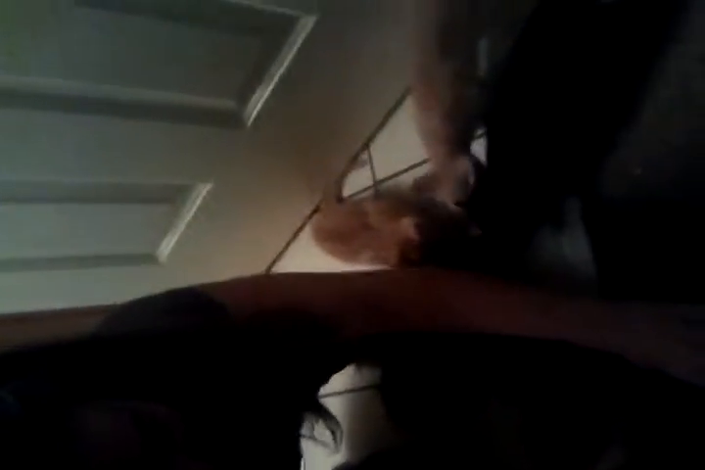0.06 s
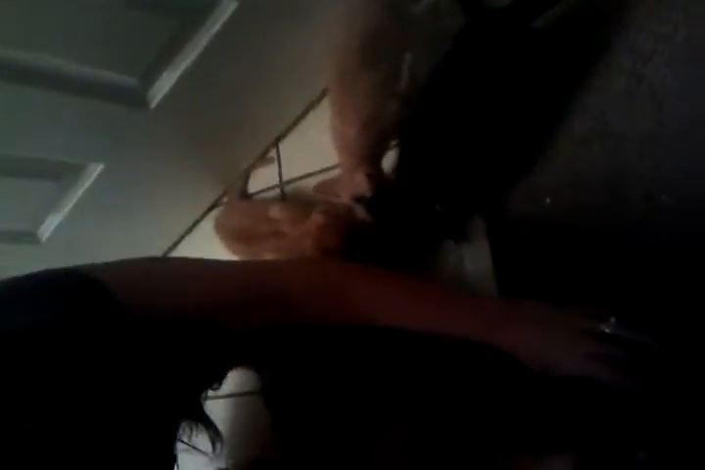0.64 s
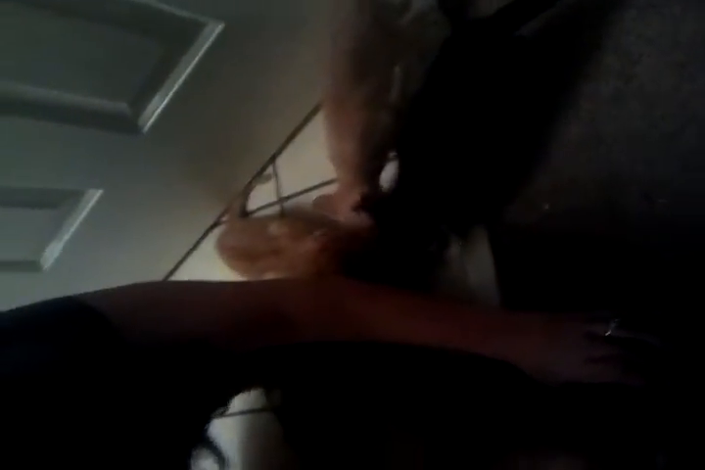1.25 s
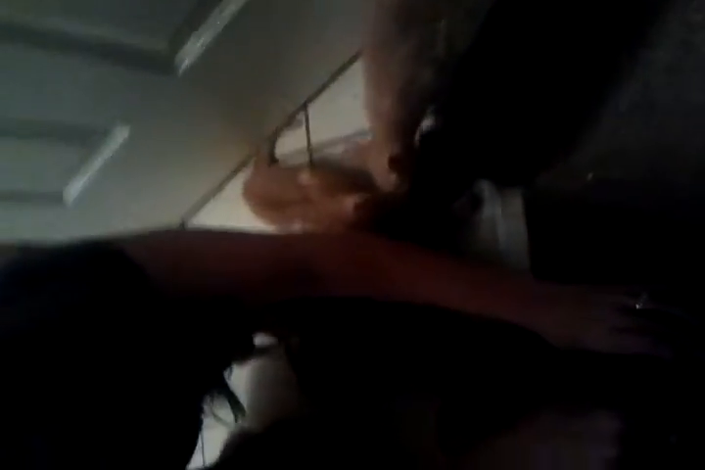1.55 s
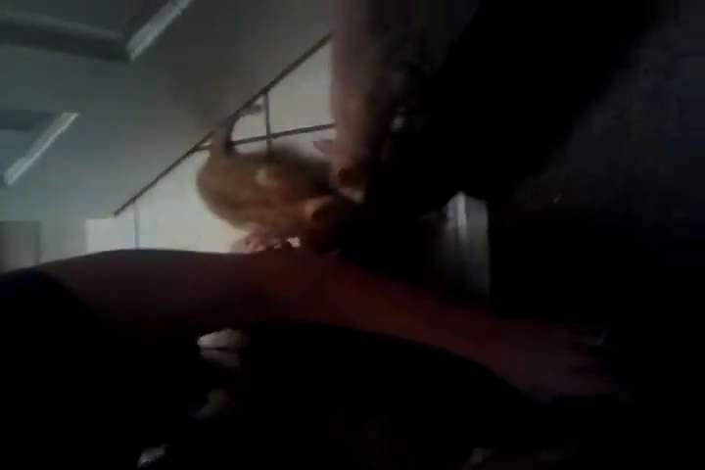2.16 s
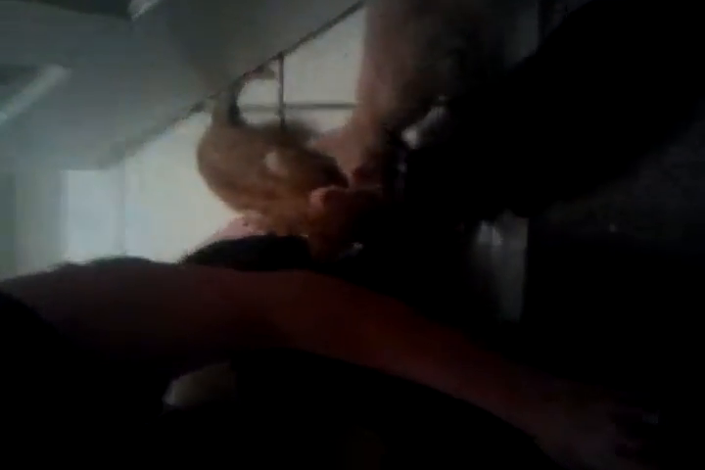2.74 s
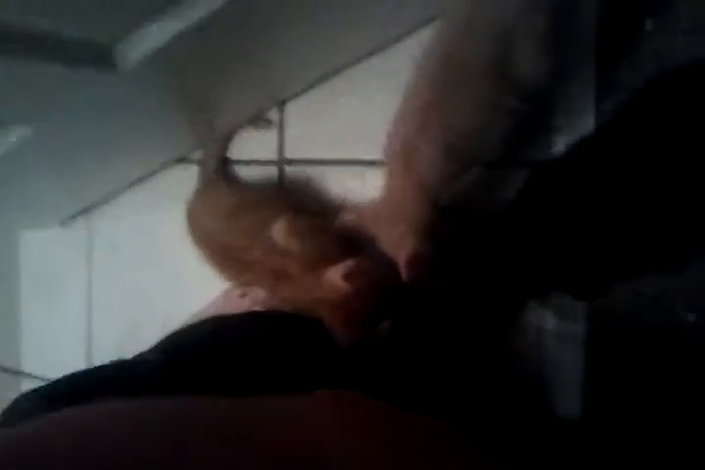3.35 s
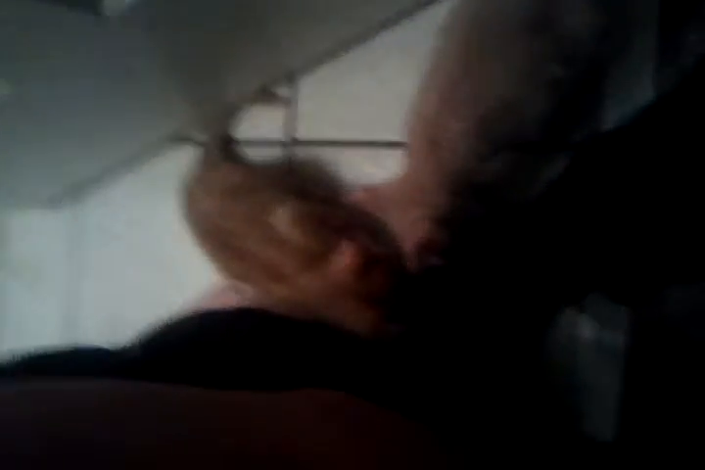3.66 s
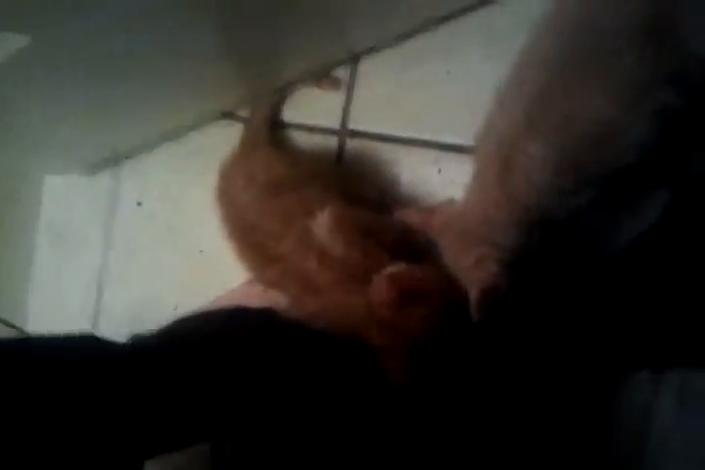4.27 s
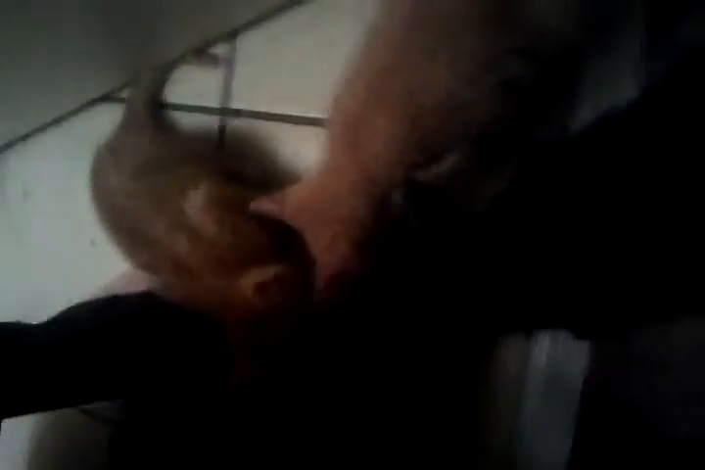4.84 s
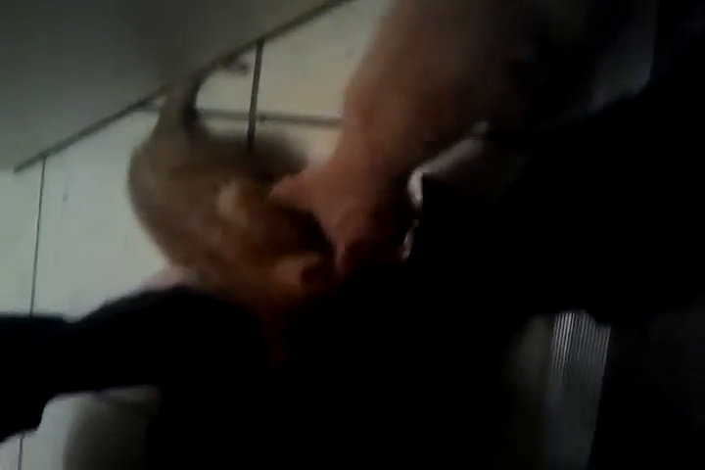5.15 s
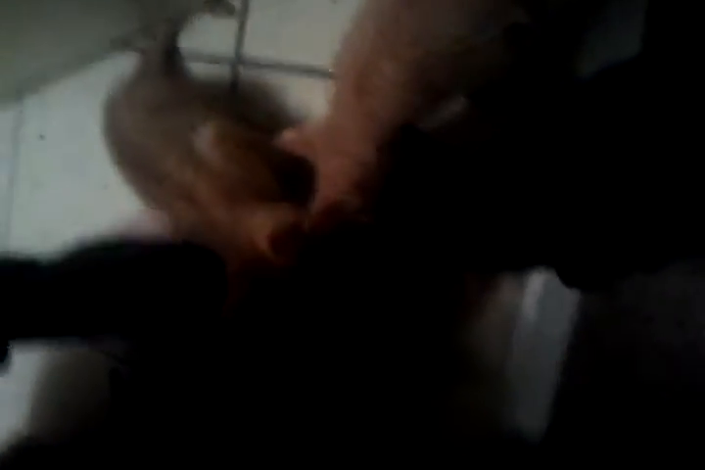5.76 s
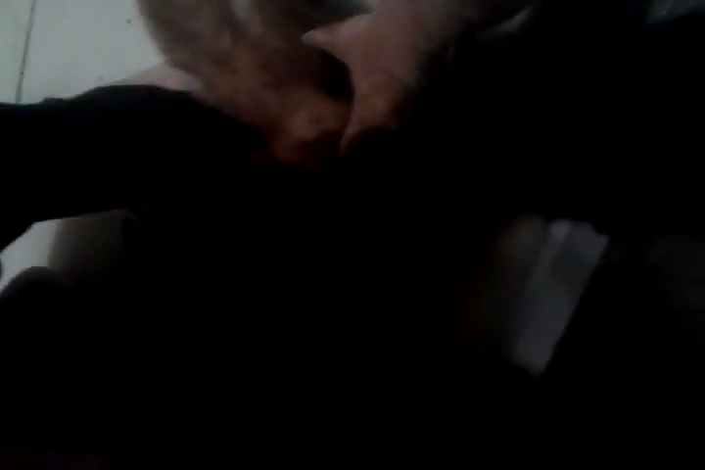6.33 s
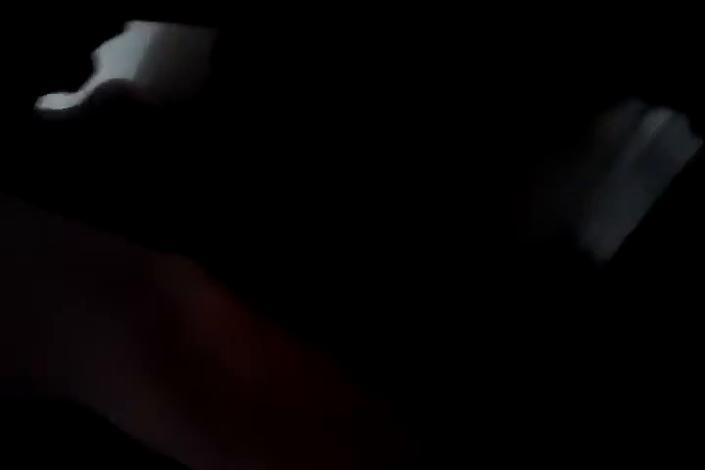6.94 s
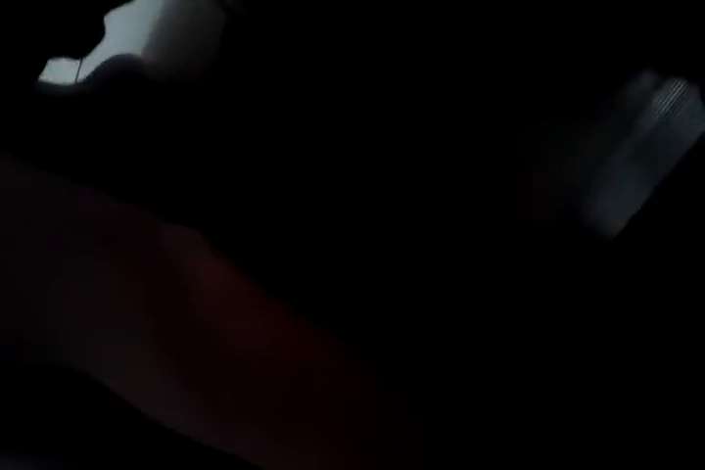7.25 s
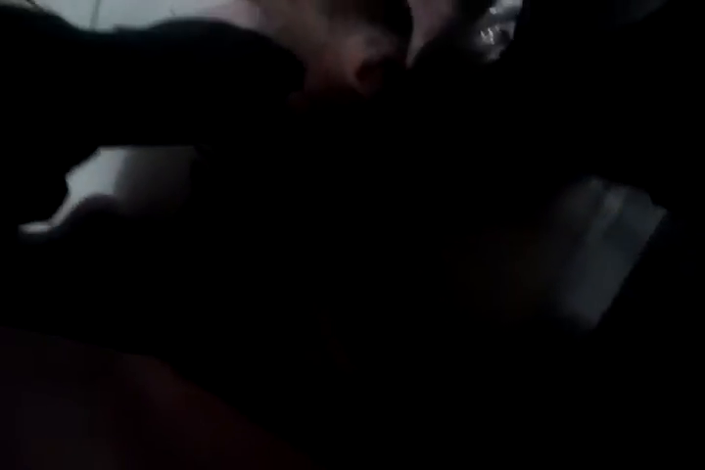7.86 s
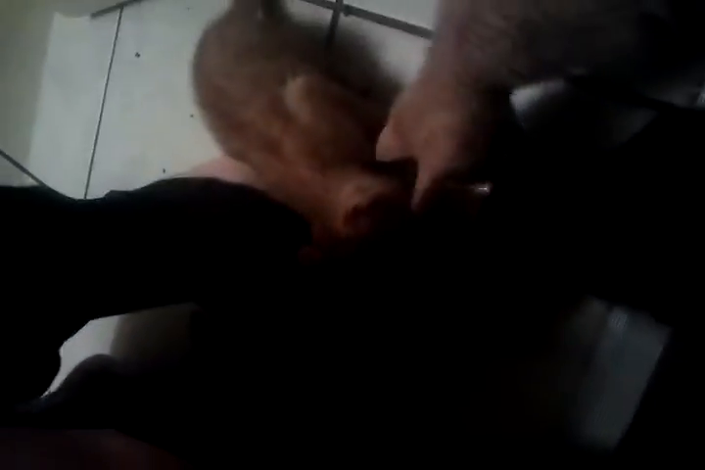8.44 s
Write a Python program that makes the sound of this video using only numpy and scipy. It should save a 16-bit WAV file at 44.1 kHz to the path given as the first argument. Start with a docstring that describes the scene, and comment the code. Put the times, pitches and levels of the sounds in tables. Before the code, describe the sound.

Faint, muffled scrapes of a plastic bowl on tiles mix with small chewing ticks and dull footsteps. Then cloth rubs right on the microphone with a quick run of sharp clicks and knocks, the loudest moment. Afterwards the kittens sound nearer: the bowl slides and taps a few more times, and they nibble, lick and smack softly over light brushing and low room hiss.

```python
"""Kittens eat from a plastic bowl: teeth tick, mouths smack, and the bowl scuffs and taps on the tiles
as they push it. A phone is held just above them, at first shaded by an arm; then a sleeve drags over it
and its case clatters. Soft steps, a thin whirr and a few clinks pass by, and later something rubs with
a soft squeak. The room is quiet, and the treble is cut off above about 8 kHz."""
import sys
import numpy as np
from scipy import signal
from scipy.fft import rfft, irfft
from scipy.io import wavfile
from scipy.ndimage import uniform_filter1d

SR = 44100
rng = np.random.default_rng(int(sys.argv[2]) if len(sys.argv) > 2 else 0)


def to_wav(sig):
    """Store sig (one row per channel, or 1-D mono) as 16-bit WAV at the path in sys.argv[1].

    Samples outside -1..1 are clipped; the rate is SR.
    """
    pcm = np.clip(np.atleast_2d(sig), -1, 1) * 32767
    pcm = np.round(pcm).astype(np.int16)
    wavfile.write(sys.argv[1], SR, pcm.T)  # frames by channels


N = 374850
T = np.arange(N) / SR


def undb(db):
    """Turn decibels into a factor to multiply by."""
    return 10 ** (np.asarray(db) / 20)


def unit(x):
    """Scale x to an average strength (rms) of 1."""
    return x / np.sqrt(np.mean(x ** 2))


def add(out, start_s, x):
    """Mix x into out, beginning at start_s."""
    i = int(start_s * SR)
    out[i:i + len(x)] += x[:N - i]


def colour(x, points):
    """Shape the tone of x along a curve of (f/Hz, level/dB) points."""
    hz, db = np.transpose(points)
    bin_hz = np.maximum(np.arange(len(x) // 2 + 1) * SR / len(x), 1)
    curve_db = np.interp(np.log(bin_hz), np.log(hz), db)
    return irfft(rfft(x) * undb(curve_db), len(x))


def band(x, hz, kind, order=2):
    """Keep what lies below hz ("low") or above it ("high")."""
    return signal.sosfilt(signal.butter(order, hz, kind, fs=SR, output="sos"), x)


def resonate(x, hz, width_hz):
    """A resonance: keep the band around hz. The narrower it is, the longer it rings."""
    sharpness = hz / min(width_hz, SR / 4)
    return signal.lfilter(*signal.iirpeak(min(hz, SR / 4), sharpness, fs=SR), x)


def wander(rate):
    """A smooth random curve, mostly within -1 to 1, that finds a new value rate times a second."""
    hold = int(SR / rate)
    stairs = np.repeat(rng.standard_normal(N // hold + 1), hold)
    return 1.3 * uniform_filter1d(uniform_filter1d(stairs, hold), hold)[:N]


def friction(grip_db, catch_hz):
    """One second of tiny slips whose strength comes and goes as two surfaces catch."""
    span = int(SR / catch_hz)
    catch = unit(uniform_filter1d(uniform_filter1d(rng.standard_normal(SR), span), span))
    return rng.standard_normal(SR) * undb(grip_db * catch)


def tint(x, bass_db, treble_db):
    """Set the bass and treble of one second of sound against its middle, which gets strength 1."""
    hz, spectrum = np.maximum(np.arange(SR // 2 + 1), 1.), rfft(x)
    low = 1 / (1 + (hz / 700) ** 8)
    high = 1 / (1 + (3300 / hz) ** 10)
    parts = (bass_db, low), (0, 1 - low - high), (treble_db, high)
    return sum(undb(db) * unit(irfft(spectrum * share, SR)) for db, share in parts)


def swell(rise_s, fall_s, shape):
    """The loudness of one slide: a smooth rise, then a fall of the given shape."""
    t = T[:SR]
    rise = np.sin(np.pi / 2 * np.minimum(t / rise_s, 1)) ** 2
    return rise * shape(np.maximum(t - rise_s, 0) / fall_s)


def decay(progress):
    """Dying away. Pass t / t60, where t60 is the time a sound takes to fall by 60 dB."""
    return undb(-60 * progress)


def ease_out(progress):
    """A gentle fade that reaches silence when progress is 1."""
    return np.cos(np.pi / 2 * np.minimum(progress, 1)) ** 2


def crackles(events, attack_s=0.000088, scatter=0.23):
    """Short bursts of noise, one for each (t/s, level/dB, f/Hz, t60/s, width as a share of f)."""
    out, t = np.zeros(N), T[:SR // 8]
    for (start, db, hz, t60, width), noise in zip(events, rng.standard_normal((len(events), len(t)))):
        main = resonate(noise, hz, width * hz)
        drop = np.clip(scatter * width * abs(noise[0]), 0, .7)  # the lower ring differs every time
        lower = undb(-3) * resonate(noise, hz * (1 - drop), width_hz=500)
        fade = (1 - np.exp(-t / attack_s)) * decay(t / t60)
        burst = unit((main + lower) * fade)
        add(out, start, undb(db) * np.sqrt(np.mean(fade ** 2)) * burst)
    return out


def background(air_db=-56.5, sway_db=-0.5, hum_sway_db=2.5):
    """Quiet room air and microphone hiss, with a faint household hum that comes and goes."""
    # tone of the air and hiss: f/Hz, relative level/dB
    air_tone = [(15, -44.5), (25, -24), (91, -9), (108, -9), (215, -4), (255, -5), (281, -6), (386, -4.5),
                (469, -4.5), (908, -8.5), (1050, -8.5), (2790, -16), (6900, -17.5), (8600, -16.5),
                (11200, -85), (18900, -120)]
    # notes of the hum: f/Hz, typical level/dB
    hum_notes = [(120, -77.5), (234, -77.5), (285, -72.5), (478, -75.5)]
    air = unit(colour(rng.standard_normal(N), air_tone)) * undb(air_db + sway_db * wander(11))
    hum = np.zeros(N)
    for hz, db in hum_notes:
        note = unit(np.sin(2 * np.pi * hz * T + wander(5)))
        hum += note * undb(db + hum_sway_db * wander(0.68))
    return air + hum


def bowl(gain_db=-2, judder_db=8, shaded_until_s=2.5, tap_rise_s=0.0021, tap_t60=0.05, tap_hz=1200):
    """Each push makes the bowl slide or tap; it judders at one pitch and sets its walls ringing."""
    # slides over the tiles: t/s, rise/s, t60/s, relative level/dB, judder f/Hz
    scuffs = [(0.407, 0.0039, 0.52, -45.5, 1570), (.437, 0.0022, 0.17, -35.5, 2610),
              (.6, 0.028, .17, -50, 1290), (0.905, .003, 0.51, -44, 1285), (1.251, 0.0023, 0.29, -38, 1360),
              (1.277, 0.012, 0.25, -40.5, 1120), (1.398, 0.0038, 0.18, -44, 1170),
              (1.534, 0.0069, .1, -47, 484), (1.649, 0.0044, 0.33, -38.5, 1140),
              (3.486, 0.0032, .1, -25.5, 1180), (3.503, 0.015, 0.18, -30, 1240),
              (3.542, 0.015, 0.19, -33.5, 987), (3.62, 0.023, 0.23, -38.5, 1315),
              (3.761, 0.0025, 0.24, -40, 1040), (3.774, .014, .16, -34, 1130),
              (4.783, .003, 0.093, -36, 2530), (4.798, 0.017, 0.23, -34.5, 670),
              (4.899, 0.059, 0.21, -41.5, 1090), (4.976, .015, 0.39, -40, 2550),
              (5.085, 0.028, 0.14, -40.5, 4300), (5.167, 0.014, 0.17, -43, 614)]
    # taps down on the tiles: t/s, relative level/dB
    taps = [(1.321, -36.5), (3.486, -27), (3.575, -24.5), (3.799, -31), (4.81, -38), (4.845, -35.5)]
    # resonances of the plastic walls: f/Hz, width/Hz, relative level/dB
    rings = [(370, 580, -9), (618, 210, -0.5), (1080, 155, 4.5), (1297, 237, 2), (1610, 334, 1.5),
             (2113, 245, -0.5), (2550, 160, 0), (3300, 310, -7), (3920, 270, -9.5), (4250, 140, -7.5),
             (5110, 340, -11.5), (5600, 77, -7), (6040, 190, -10), (6660, 95, -6), (7300, 1700, -13.5)]
    out = np.zeros(N)
    pushes = scuffs + [(start, tap_rise_s, tap_t60, db, tap_hz) for start, db in taps]
    for start, rise_s, t60, level_db, judder_hz in pushes:
        slips = friction(grip_db=2, catch_hz=570)
        slips = slips + undb(judder_db) * resonate(slips, judder_hz, width_hz=110)
        walls = sum((-1) ** k * undb(db) * resonate(slips, hz, width)
                    for k, (hz, width, db) in enumerate(rings))
        # an arm shades the bowl at first: more bass, less treble
        bass_db, treble_db = (-10.5, -13.5) if start < shaded_until_s else (-12.5, -1)
        add(out, start, undb(level_db) * tint(walls, bass_db, treble_db) * swell(rise_s, t60, decay))
    return undb(gain_db) * out


def whirr(spacing_hz=943, width_hz=460):
    """A thin whirr, perhaps the lens focusing: hiss gathered in evenly spaced treble bands."""
    # spells of whirring: t/s, length/s, level/dB
    spells = [(0.55, 0.17, -60.5), (1.424, 0.21, -61), (2.583, 0.23, -57)]
    noise, bands, loudness = rng.standard_normal(N), np.zeros(N), np.zeros(N)
    for multiple, db in enumerate([-4, -6, 1, -3, 1, -2], start=4):
        hz = multiple * spacing_hz
        bands += undb(db) * resonate(resonate(noise, hz, width_hz), hz, width_hz)
    for start, length, db in spells:
        add(loudness, start, undb(db) * signal.windows.tukey(int(length * SR)))
    return unit(bands) * loudness


def steps(t60=0.13, attack_s=0.00055):
    """Soft steps and shifting weight give the floor dull bumps that die quickly."""
    # bumps of the floor: t/s, level/dB, f/Hz
    bumps = [(0.623, -46.5, 232), (.72, -51, 270), (1.338, -53, 237), (1.424, -50, 226), (1.651, -43, 400),
             (3.955, -37.5, 450), (4.42, -51, 190), (4.496, -44.5, 200), (5.701, -49, 392)]
    out, t = np.zeros(N), T[:SR // 5]
    fade = (1 - np.exp(-t / attack_s)) * decay(t / t60)
    for start, db, hz in bumps:
        ring = resonate(rng.standard_normal(len(t)), hz, hz / 2)
        thud = unit(band(ring, 2 * hz, "low"))
        add(out, start, undb(db) * thud * fade)
    return out


def chewing(gain_db=-7, bite_hz=7030, bite_t60=0.024, bite_width=0.82, smack_t60=0.089, smack_width=1,
            nibble_count=18, nibbles_from_s=4.3):
    """Teeth tick brightly and mouths smack more dully; once the phone is near, nibbles join in."""
    # teeth on the food: t/s, relative level/dB
    bites = [(.711, -37), (.908, -32), (1.256, -26.5), (1.323, -33), (2.039, -33.5), (2.151, -38),
             (4.344, -33), (4.375, -22), (5.28, -30.5), (5.517, -32.5), (5.764, -26.5), (6.106, -33.5),
             (6.404, -31), (6.548, -32), (8.061, -35.5), (8.226, -40), (8.386, -24), (8.429, -36.5)]
    # mouth smacks: t/s, relative level/dB, f/Hz
    smacks = [(5.703, -41, 4130), (6.5, -38, 1880), (6.583, -36.5, 2270), (6.65, -36.5, 2580),
              (6.701, -37.5, 2500), (7.364, -39.5, 3470), (7.7, -43, 2480), (8.189, -36, 3780)]
    events = [(start, db, bite_hz, bite_t60, bite_width) for start, db in bites]
    events += [(start, db, hz, smack_t60, smack_width) for start, db, hz in smacks]
    nibble_times = rng.uniform(nibbles_from_s, T[-1], nibble_count)
    for start, (size, pitch) in zip(nibble_times, rng.standard_normal((nibble_count, 2))):
        db, hz = -41 + 2 * size, 5000 * 2 ** (0.61 * pitch)
        events.append((start, db, hz, bite_t60, bite_width))
    return undb(gain_db) * crackles(events)


def cloth(catch_hz, bass_db, treble_db):
    """One second of rubbing cloth: many tiny slips blur into a hiss."""
    # tone of the rubbing: f/Hz, relative level/dB
    tone = [(40, -19), (120, -18), (300, -12.5), (850, -2), (1500, -2), (2600, -2.5), (3500, -1),
            (4500, 2.5), (5500, 2), (7200, 3.5), (8600, -0.5)]
    slips = friction(grip_db=1, catch_hz=catch_hz)
    return tint(colour(slips, tone), bass_db, treble_db)


def sleeve(even_db=-42, bass_slope=0.81):
    """A sleeve drags over the phone: a slow drag rumbles, a hard one hisses."""
    # how hard it drags: t/s, level of the middle pitches/dB
    drag = [(2.802, -47), (2.805, -26.5), (2.852, -33), (2.864, -55), (2.884, -56), (2.892, -38.5),
            (2.94, -38), (2.98, -23), (3.005, -28.5), (3.022, -38.5), (3.05, -30), (3.08, -49), (3.17, -53),
            (3.22, -38), (3.34, -42), (3.362, -51), (3.393, -35), (3.405, -56)]
    # how bright it is: t/s, treble against the middle/dB
    brightness = [(2.805, -18), (2.828, 0), (2.86, -8.5), (2.98, -.5), (3.08, -5.5), (3.27, -6), (3.375, 7)]
    out, t = np.zeros(N), drag[0][0] + T[:SR]
    db = np.interp(t, *np.transpose(drag))
    bass_db = bass_slope * (even_db - db)  # at even_db, bass and middle are equally strong
    treble_db = np.interp(t, *np.transpose(brightness))
    rub = cloth(catch_hz=380, bass_db=bass_db, treble_db=treble_db)
    add(out, t[0], undb(db) * rub * (t < drag[-1][0]))
    return out


def phone_case(snap_t60=0.00099, knock_cycles=4.5, crack_db=-17, crack_s=0.0013):
    """Snaps and knocks reach the microphone through the case, each a very short ring and a crack."""
    # the case snaps: t/s, relative level/dB, f/Hz
    snaps = [(2.8045, -9, 880), (2.8082, -6.5, 1950), (2.8475, -14, 1290), (3.0956, -11.5, 1660),
             (3.1184, 2.5, 2340), (3.118, -7.5, 4600), (3.1968, -16, 5030), (3.23, -18, 2500),
             (3.259, -15, 2500), (3.282, 1, 5040), (3.3956, -6.5, 4000), (3.5785, -7.5, 2540),
             (4.5226, -12.5, 3620), (7.0925, -11.5, 1690), (7.2202, -14, 1670)]
    # fingers knock on it: t/s, relative level/dB, f/Hz
    knocks = [(2.8049, -27, 220), (3.1003, -27, 250), (3.116, -24, 960), (3.129, -13, 1080),
              (3.148, -31, 650), (3.1978, -17, 1250), (3.203, -25.5, 175), (3.2136, -10, 690),
              (3.244, -9, 750), (3.2905, -16.5, 626), (3.3677, -17.5, 348), (3.395, -25, 260)]
    out, t = np.zeros(N), T[:SR // 30]
    hits = [(start, db, hz, snap_t60) for start, db, hz in snaps]
    hits += [(start, db, hz, knock_cycles / hz) for start, db, hz in knocks]
    for (start, db, hz, t60), noise in zip(hits, rng.standard_normal((len(hits), len(t)))):
        ring = np.sin(2 * np.pi * hz * t) * decay(t / t60)
        crack = undb(crack_db) * noise * np.exp(-t / crack_s)
        hit = band(ring / ring.max() + crack, 0.3 * hz, "high")  # higher hits keep less bass
        add(out, start, undb(db) * hit)
    return out


def brushing(rise_share=0.55):
    """Cloth and fur brush lightly, swelling and fading."""
    # strokes: t/s, length/s, level of the middle pitches/dB, treble against the middle/dB
    strokes = [(3.35, 0.21, -54.5, 6), (3.865, 0.094, -50, 10), (3.939, 0.059, -49.5, 11.5),
               (3.957, 0.14, -53, 15), (4.196, 0.09, -41.5, 7.5), (3.851, 0.97, -58, 8.5),
               (5.84, 0.34, -49, -4), (6.879, .16, -53.5, 1), (7.078, 0.07, -54.5, 8.5),
               (7.131, 0.097, -52, 2), (7.733, 0.075, -46.5, 5)]
    out = np.zeros(N)
    for start, length, db, treble_db in strokes:
        rub = cloth(catch_hz=770, bass_db=-9.5, treble_db=treble_db)
        loudness = swell(rise_share * length, (1 - rise_share) * length, ease_out)
        add(out, start, undb(db) * rub * loudness)
    return out


def clinking(gain_db=-7, width=0.06):
    """Something small and hard clinks: a brief, narrow ring high in the treble."""
    # clinks: t/s, relative level/dB, f/Hz, t60/s
    clinks = [(3.488, -6, 7100, 0.046), (3.763, -28, 6700, 0.043), (4.272, -17, 7700, .011)]
    return undb(gain_db) * crackles([(*clink, width) for clink in clinks])


def licking(count=45, from_s=4.9, db=-54, spread_db=3, hz=5500, width_hz=4500, t60=0.055):
    """Tongues make faint wet ticks at random, heard once the phone is near the kittens."""
    loudness, t = np.zeros(N), T[:SR // 20]
    for start, size in zip(rng.uniform(from_s, T[-1], count), rng.standard_normal(count)):
        add(loudness, start, undb(db + spread_db * size) * decay(t / t60))
    return loudness * unit(resonate(rng.standard_normal(N), hz, width_hz))


def squeak(gain_db=-3, hz=873, waver=0.0163, lower_hz=590, width_hz=60):
    """A rubbed edge sings on one rough, wavering note, with a weaker resonance below it."""
    # how the squeak swells and fades: t/s, relative level/dB
    outline = [(6.88, -70), (6.932, -51), (7.026, -36.5), (7.046, -44), (7.148, -52), (7.204, -41.5),
               (7.296, -71), (7.378, -48), (7.42, -92)]
    times, db = np.transpose(outline)
    grip = undb(3 * wander(110))
    pitch_hz = hz * (1 + waver * wander(140))
    note = unit(np.sin(2 * np.pi * np.cumsum(pitch_hz) / SR) * grip)
    slips = rng.standard_normal(N)
    rasp = undb(-3) * unit(resonate(slips, hz, width_hz))
    lower = undb(-12) * unit(resonate(slips, lower_hz, width_hz))
    loudness = undb(gain_db + np.interp(T, times, db)) * (T > times[0]) * (T < times[-1])
    return (note + rasp + lower) * loudness


def room(x, echo_db, t60, gap_s):
    """Add quick echoes from the tiles and the door."""
    t = T[:SR // 2]
    tail = rng.standard_normal(len(t)) * decay(t / t60) * (t > gap_s)
    return x + undb(echo_db) * signal.fftconvolve(x, tail / np.linalg.norm(tail))[:N]


def scene():
    """The meal echoes in the room, bowl and steps longest; sounds at the phone reach it directly."""
    on_tiles = room(bowl() + steps(), echo_db=-9.5, t60=0.3, gap_s=0.0012)
    small_sounds = chewing() + clinking() + licking() + squeak()
    meal = on_tiles + room(small_sounds, echo_db=-8.5, t60=0.16, gap_s=0.0034)
    return (meal + sleeve() + brushing() + phone_case() + whirr() + background())[None]


def record(dry, top_hz=7950, clip_level=0.8, crack_top_hz=16500):
    """The treble is cut steeply, and the loudest snap is clipped flat, adding a brief bright crack."""
    narrow = band(dry, top_hz, "low", order=20)
    clipped = np.clip(narrow, -clip_level, clip_level)
    return signal.sosfilt(signal.ellip(8, .2, 70, crack_top_hz, fs=SR, output="sos"), clipped)


dry = scene()
out = record(dry)
to_wav(out)
```